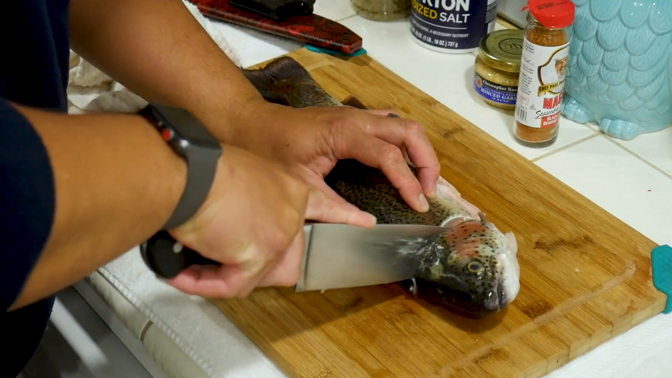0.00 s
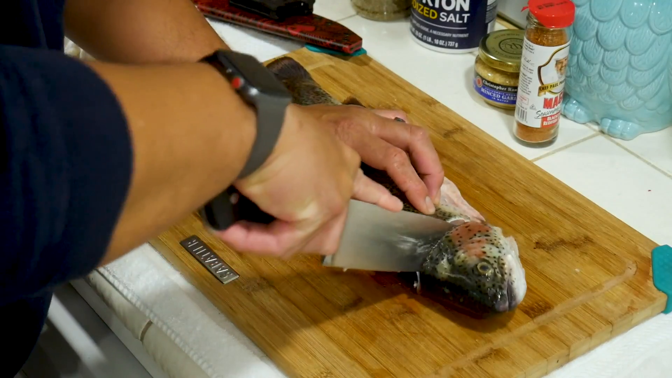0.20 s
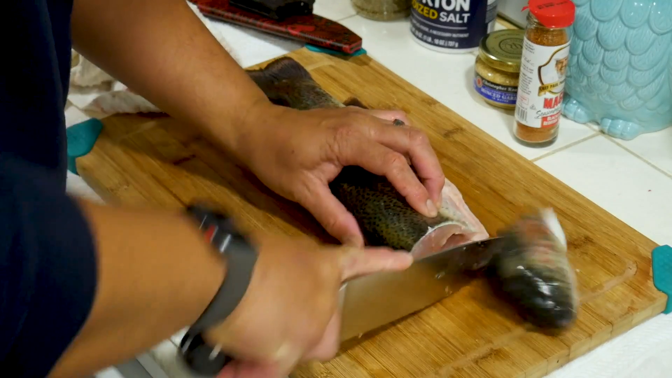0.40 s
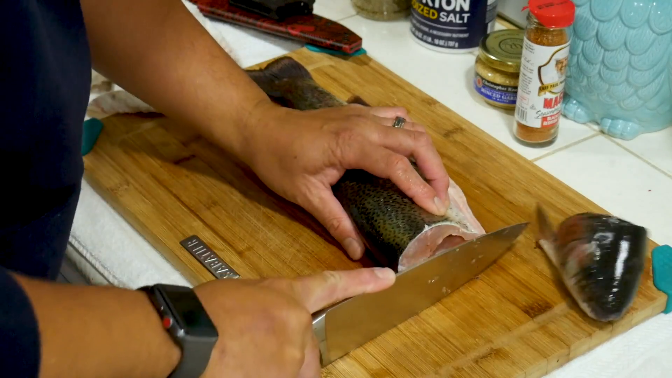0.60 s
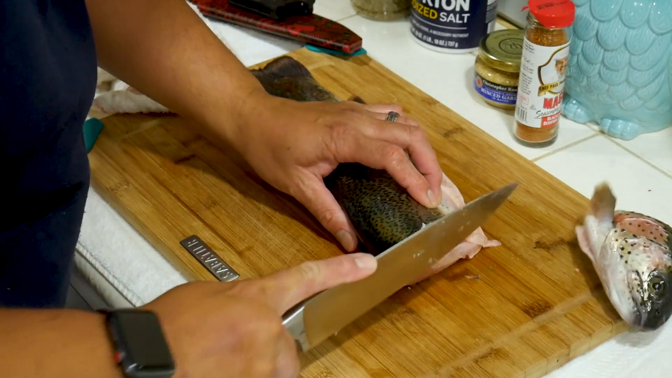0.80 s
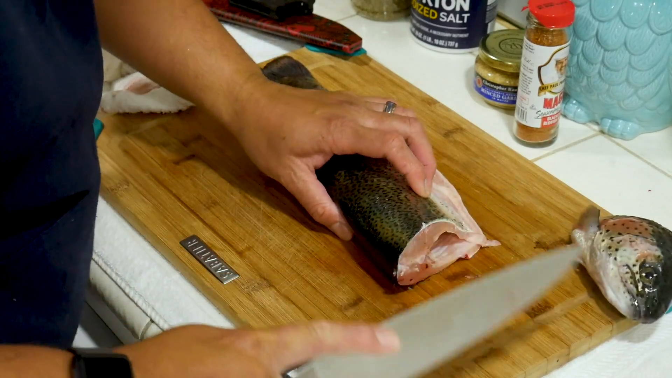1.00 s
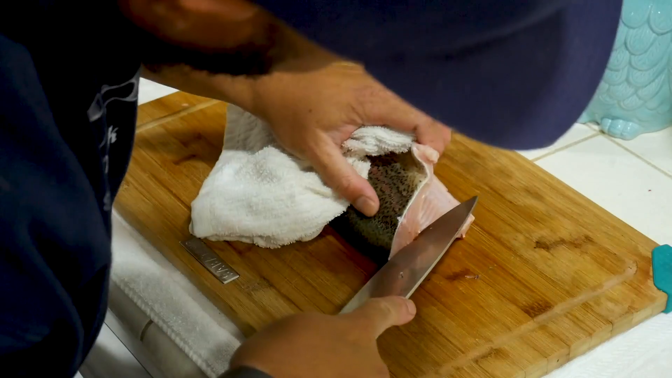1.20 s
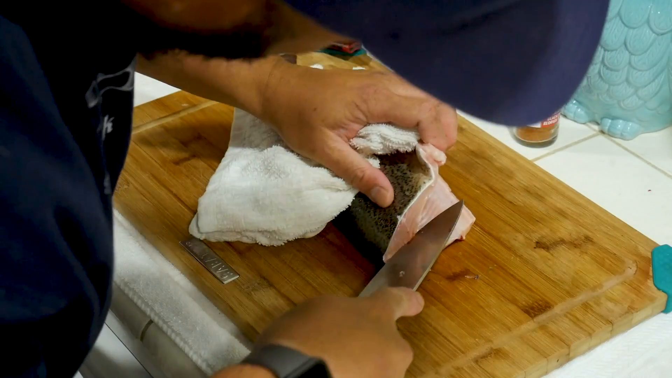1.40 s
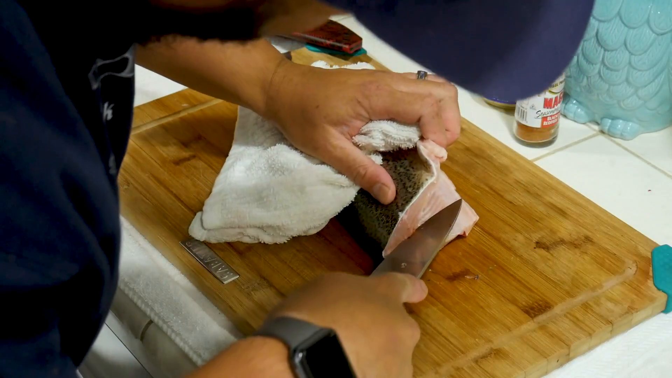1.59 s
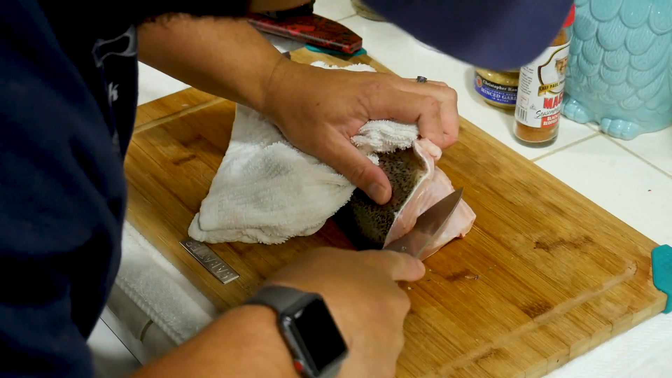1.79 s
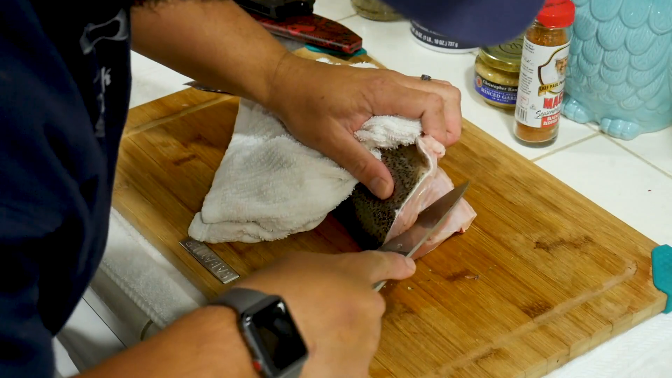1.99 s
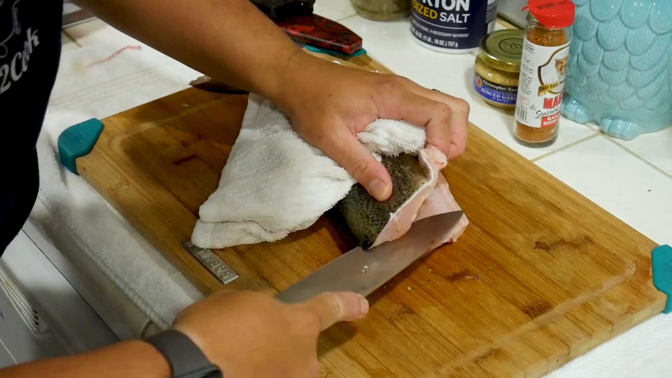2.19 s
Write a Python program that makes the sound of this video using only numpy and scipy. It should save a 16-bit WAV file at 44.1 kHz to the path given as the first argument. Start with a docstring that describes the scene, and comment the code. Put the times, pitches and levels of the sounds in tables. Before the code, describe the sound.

A knife chops through a fish's backbone with one loud sharp snap and board thuds

```python
"""A knife cuts through a fish on a wooden board, heard close: the backbone snaps, the blade hisses on and
crunches onto the wood with soft thuds; later small bones crack and skin ticks over a low appliance drone.
The snap is one coloured impulse, cracks are noise bursts with a short ring, thuds are board and counter
modes, the slide is dense noise grains, ticks are damped sines. Two decaying noises make the tiled kitchen."""
import sys
import numpy as np
from scipy import signal
from scipy.fft import rfft, irfft, next_fast_len
from scipy.io import wavfile
from scipy.ndimage import map_coordinates

SR = 44100
rng = np.random.default_rng(int(sys.argv[2]) if len(sys.argv) > 2 else 0)


def generate_wav(sig):
    """Save sig (samples, or channels by samples) to the path in sys.argv[1] as 16-bit PCM at SR."""
    pcm = np.round(np.clip(np.atleast_2d(sig).T, -1, 1) * 32767).astype(np.int16)
    wavfile.write(sys.argv[1], SR, pcm)


def magnitude_from_level(level_db):
    """Linear magnitude for a level in decibels (20 dB per decade)."""
    exponent = np.asarray(level_db, float) / 20
    return 10 ** exponent


N = 97020  # samples, 2.2 s


def unit(x):
    """Scale to rms 1."""
    return x / np.sqrt(np.mean(x ** 2) + 1e-20)


def along(points, hz):
    """Read a curve of (Hz, value) points on a log frequency axis."""
    f, v = np.transpose(points)
    return np.interp(np.log(hz + 1), np.log(f + 1), v)


def filtered(x, response):
    """Filter x by a response given as a function of frequency."""
    n = x.shape[-1]
    m = next_fast_len(n + 8192)
    return irfft(rfft(x, m) * response(np.fft.rfftfreq(m, 1 / SR)), m)[..., :n]


def resonance(f, hz, width_hz):
    """Complex response of one causal resonance, gain 1 at its peak."""
    return 1j * f * width_hz / (hz * hz - f * f + 1j * f * width_hz + 1e-9)


def add(track, s, sound):
    """Mix a sound into the track at s seconds."""
    spot = track[round(s * SR):][:len(sound)]
    spot += sound[:len(spot)]


def wobble(rate):
    """A smooth random curve with rate knots a second."""
    knots = rng.standard_normal(int(N * rate / SR) + 4)
    return map_coordinates(knots, [np.arange(N) * rate / SR])


def drone():
    """Appliance rumble and microphone hiss as shaped noise in the middle, a far fainter noise at the sides."""
    # colour of the rumble and hiss in the middle: f/Hz, relative density/dB per Hz
    mid_colour = [(12, -47.5), (20, -10), (69, -0.5), (160, -14.5), (189, -2.5), (289, -2.5), (323, -0.5),
                  (361, -7), (535, -12), (583, -12.5), (863, -18), (1050, -22), (1430, -23.5), (1790, -27),
                  (3830, -35), (14300, -39.5), (16500, -54)]
    # colour of the faint, independent noise at the sides: f/Hz, relative density/dB per Hz
    side_noise_colour = [(12, -41.5), (20, -8), (82, -16.5), (135, 0.5), (400, -1), (14300, -3.5),
                         (16500, -26)]
    level_db, side_noise_db = -52.5, -21.5  # side noise relative to the middle
    mid = unit(filtered(rng.standard_normal(N), lambda f: magnitude_from_level(along(mid_colour, f))))
    side_noise = unit(filtered(rng.standard_normal(N), lambda f: magnitude_from_level(along(side_noise_colour, f))))
    return magnitude_from_level(level_db + 1.2 * wobble(5.6)) * np.array([mid, magnitude_from_level(side_noise_db) * side_noise])


def kitchen(x):
    """Near counter and tiles answer first, the room dies band by band; mid and side answers are unrelated."""
    # how long the room rings: f/Hz, t60/s
    room_decay = [(70, 0.25), (250, 0.99), (600, 0.65), (2000, 0.68), (5500, .58), (8000, 0.45),
                  (12000, 0.368)]
    room_db, near_db, near_t60_s = -11, -6, 0.071
    hz, frame_s, noise = signal.stft(rng.standard_normal((2, SR)), SR, nperseg=256)
    decay = magnitude_from_level(-60 * frame_s / along(room_decay, hz)[:, None])
    tail = signal.istft(noise * decay, SR, nperseg=256)[1]
    t = np.arange(tail.shape[1]) / SR
    room = tail * (1 - np.exp(-t / 0.01))  # swells in over about 10 ms
    near = rng.standard_normal(tail.shape) * magnitude_from_level(-60 * t / near_t60_s)
    answer = magnitude_from_level(room_db) * room / np.linalg.norm(room[0])
    answer = answer + magnitude_from_level(near_db) * near / np.linalg.norm(near[0])
    delayed = np.pad(x, (60, 0))  # 1.4 ms to the first surface
    return signal.fftconvolve(delayed[None], answer, axes=1)[:, :N]


def ticks():
    """Wet skin and scales part in tiny damped sine clicks, joined by a faint even patter."""
    # skin and scales: t/s, level/dB, f/Hz; level and pitch vary a little at random
    skin_ticks = [(0.063, -45.5, 4615), (0.288, -32, 8550), (0.312, -38, 7540), (0.331, -31.5, 7000),
                  (0.3704, -31, 8145), (0.372, -31.5, 8660), (0.728, -35, 8560), (0.742, -41, 7450),
                  (0.771, -37.5, 8000), (0.779, -38.5, 8100), (0.856, -43.5, 8950)]
    # even patter: start/s, length/s, rate/pulses per s, level/dB, f/Hz
    start_s, length_s, rate, patter_db, patter_hz = (1.181, .25, 29.9, -45.5, 1850)
    tick_cycles, patter_cycles = 17, 10.4  # cycles to fall by 60 dB
    out, t = np.zeros(N), np.arange(SR // 50) / SR
    rows = [(*row, tick_cycles) for row in skin_ticks]
    for s in np.arange(start_s, start_s + length_s, 1 / rate):
        rows.append((s, patter_db, patter_hz, patter_cycles))
    for s, db, hz, cycles in rows:
        size, pitch = rng.standard_normal(2)
        envelope = magnitude_from_level(db + 1.2 * size - 60 * t * hz / cycles) * (1 - np.exp(-t * hz))
        add(out, s, envelope * np.sin(2 * np.pi * hz * (1 + 0.03 * pitch) * t))
    return out


def slide():
    """The blade slides through the cut: dense random grains of steel on flesh and bone over soft noise."""
    # loudness of the rub: t/s, level/dB
    rub_level = [(0, -57.5), (0.078, -63), (.19, -73), (.21, -60), (0.257, -44.5), (.33, -47.5),
                 (.38, -53.5), (.42, -43.5), (.7, -65), (0.799, -68), (1.0, -77.5), (2.121, -73.5),
                 (2.144, -61), (2.2, -86.5)]
    # colour of the rub: f/Hz, relative density/dB per Hz
    rub_colour = [(300, -34.5), (1000, -3), (4000, -5), (4600, 0.5), (6200, -2.5), (8000, 0.5), (10500, -9),
                  (15000, -19), (17000, -36)]
    grains_per_s, grain_spread_db = 1700, 5.5
    s, db = np.transpose(rub_level)
    hits = rng.random(N) < grains_per_s / SR
    boost = magnitude_from_level(grain_spread_db * np.minimum(rng.exponential(size=N), 2))
    grains = hits * rng.standard_normal(N) * boost
    rough = unit(grains) + 0.3 * rng.standard_normal(N)
    rub = unit(filtered(rough, lambda f: magnitude_from_level(along(rub_colour, f))))
    return rub * magnitude_from_level(np.interp(np.arange(N) / SR, s, db) + 2.3 * wobble(60))


def slice_hiss():
    """The flat of the blade hisses through the parted bone: a steep-edged noise band after the snap."""
    # loudness of the hiss: t/s, level/dB
    hiss_level = [(.204, -92), (.215, -39.5), (0.302, -43), (0.366, -48), (.4, -66)]
    centre_hz, width_hz = 5400, 1900
    s, db = np.transpose(hiss_level)
    noise = rng.standard_normal(N)
    band = unit(filtered(noise, lambda f: 1 / (1 + (2 * (f - centre_hz) / width_hz) ** 4)))
    return band * magnitude_from_level(np.interp(np.arange(N) / SR, s, db, right=-120) + 1.5 * wobble(64))


def thuds():
    """Flesh and blade land: decaying board modes, duller for a longer contact, and a boom in the counter."""
    # landings: t/s, board level/dB, contact/s, counter boom level/dB
    landings = [(0.205, -31, 0.0008, -44), (0.258, -33.5, 0.0012, -52), (0.288, -40, 0.00062, -63),
                (0.332, -40.5, 0.00028, -57), (0.3748, -23, 0.0015, -42), (0.385, -19.5, 0.0016, -51),
                (0.392, -27, 0.00099, -35), (0.439, -26, 0.00072, -38), (0.4442, -39, 0.0013, -50),
                (0.451, -34, 0.0012, -46), (0.466, -29, 0.00018, -53), (1.655, -34, 0.00037, -41),
                (1.697, -41.5, 0.00021, -40.5), (1.7045, -33, 0.00032, -61)]
    # modes of the board, detuned a little at each landing: f/Hz, relative level/dB, t60/s
    board_modes = [(220, -8, .05), (260, -2, .06), (376, -3, .045), (517, -2, .045), (620, -4, .035),
                   (740, -1, .04), (930, -3, .04), (1130, -3, .035), (1710, -4, .03), (2080, -5, .025),
                   (2800, -9, .025)]
    # modes of the counter: f/Hz, relative level/dB, t60/s
    counter_modes = [(72.6, 8, 0.186), (89.8, -7, 0.049), (167.3, 1, 0.077)]
    boom_rise_s = 0.011
    out, t = np.zeros(N), np.arange(SR // 2) / SR
    hz, level_db, t60 = np.transpose(board_modes)[:, :, None]
    boom = sum(magnitude_from_level(g - 60 * t / ring_s) * np.sin(2 * np.pi * f * t) for f, g, ring_s in counter_modes)
    boom = boom * (1 - np.exp(-t / boom_rise_s)) ** 2
    for s, db, contact_s, boom_db in landings:
        # a blow drives best the modes whose half period is near the contact time
        half_periods = 2 * hz * contact_s
        drive = 2 * half_periods ** 1.3 / (1 + half_periods ** 2.31)
        size = magnitude_from_level(level_db + 1.7 * rng.standard_normal(hz.shape) - 60 * t / t60) * drive
        detune = 1 + 0.05 * rng.standard_normal(hz.shape)
        knock = (size * np.sin(2 * np.pi * hz * detune * t)).sum(axis=0)
        add(out, s, magnitude_from_level(db) * knock * (1 - np.exp(-t / contact_s)))
        add(out, s, magnitude_from_level(boom_db) * boom)
    return out


def cracks():
    """The edge breaks bone and skin: a spike and dying gritty noise, bright in one region that rings."""
    # breaks: t/s, relative level/dB, brightest f/Hz, t60/s, top-octave gain/dB
    breaks = [(0.3745, -16, 4500, 0.053, -2.5), (0.382, -16, 3670, 0.02, 6), (0.387, -14, 7440, 0.043, -17),
              (0.391, -11.5, 7900, .024, -3), (0.3946, -11.5, 2848, 0.017, -1.5),
              (0.399, -14.5, 8140, 0.016, -7.5), (0.401, -11, 3860, 0.028, 3),
              (0.4376, -26.5, 2110, 0.019, -11.5), (0.459, -31, 2798, 0.03, -11.5),
              (0.467, -29.5, 2406, 0.036, -10.5), (0.474, -31.5, 3500, 0.031, -9.5),
              (0.945, -45.5, 5710, 0.043, -9.5), (1.5171, -42, 6430, 0.03, 8),
              (1.6537, -24.5, 11940, 0.037, 24.5), (1.657, -26.5, 7800, 0.036, -10),
              (1.6967, -23, 4970, 0.04, 0), (1.7034, -33, 5310, 0.14, 6.5), (1.7335, -20.5, 8640, 0.046, 1),
              (1.767, -28.5, 7710, 0.013, -0.5), (2.141, -47.5, 7860, 0.034, 6.5),
              (2.146, -36.5, 8300, 0.038, 16), (2.1495, -31.5, 8270, 0.023, 10.5)]
    # colour common to all: f/Hz, relative density/dB per Hz
    splinter_colour = [(350, -51.5), (600, -7.5), (1330, -10.5), (1510, -4), (2340, -7.5), (2760, -3.5),
                       (5950, -6.5), (7830, -2.5), (10600, -13), (13900, -6.5), (16000, -25.5)]
    burst_db, ring_db, ring_cycles = -9.5, -6, 61  # the ring falls 60 dB in 61 cycles
    peak_db, peak_width = -7.5, 0.2  # bright region, width as a share of its frequency
    knock_db, knock_t60_s = -1, 0.006
    top_octave_hz, spike = 10510, 3.7
    out, t = np.zeros(N), np.arange(SR // 10) / SR
    for s, db, hz, t60, top_db in breaks:
        grit = rng.standard_normal(len(t)) * magnitude_from_level(6.8 * rng.standard_normal(len(t)))
        grit[6] += spike

        def tint(f):
            base = magnitude_from_level(along(splinter_colour, f) + top_db * (f > top_octave_hz))
            return base * (1 + magnitude_from_level(peak_db) * np.abs(resonance(f, hz, peak_width * hz)))

        shape = magnitude_from_level(-60 * t / t60) + magnitude_from_level(knock_db - 60 * t / knock_t60_s)
        burst = shape * filtered(grit, tint)
        # the burst takes its energy from the envelope, whatever its colour
        add(out, s, magnitude_from_level(db + burst_db) * unit(burst) * np.sqrt(np.mean(shape ** 2)))
        ring = magnitude_from_level(db + ring_db - 60 * t * hz / ring_cycles) * np.sin(2 * np.pi * hz * t)
        add(out, s, ring)
    return out


def snap():
    """The backbone breaks: a single impulse through the minimum-phase colour of bone and blade."""
    # the break: t/s, peak level/dB
    backbone = [(0.204, 5.5)]
    # colour of the break: f/Hz, relative density/dB per Hz
    bone_colour = [(100, -32), (220, -20.5), (360, -9.5), (720, -13), (1050, -18), (2100, -11.5),
                   (3400, -15), (4150, -4.5), (4700, 1.5), (5900, -3.5), (6400, -16.5), (7000, -3.5),
                   (8500, -9.5), (9300, -18.5), (10800, -26), (11900, -12), (12800, -24.5), (14000, -17.5),
                   (16000, -28), (18000, -25.5)]
    out, m = np.zeros(N), 2048
    # folding the cepstrum forward makes the response causal
    cepstrum = irfft(np.log(magnitude_from_level(along(bone_colour, np.fft.rfftfreq(m, 1 / SR)))), m)
    cepstrum[1:m // 2] *= 2
    cepstrum[m // 2 + 1:] = 0
    ring = irfft(np.exp(rfft(cepstrum)), m)[:m // 2]
    for s, db in backbone:
        add(out, s, -magnitude_from_level(db) * ring / np.abs(ring).max())
    return out


def scene():
    """Knife work in the middle, the room barely wider."""
    # how strongly each part reaches the walls: snap/dB, cracks/dB, all the rest/dB
    sends_db = (-5, 0, -3)
    wide_db = -29  # side of the room
    parts = [snap(), cracks(), thuds() + slide() + slice_hiss() + ticks()]
    room = sum(kitchen(part) * magnitude_from_level(db) for part, db in zip(parts, sends_db))
    mid, side = room * magnitude_from_level([[0], [wide_db]]) + drone()
    mid = mid + sum(parts)
    return np.array([mid + side, mid - side])


def top_cut(x):
    """Nothing passes above the cut-off."""
    return signal.sosfilt(signal.butter(12, 16760, fs=SR, output="sos"), x)


def record(dry):
    """The camera clips at full scale and keeps little above its band limit."""
    top_hz, cut_hz = 15900, 16800  # weak above the first, silent above the second
    clipped = np.clip(dry, -1, 1)
    mix = filtered(clipped, lambda hz: np.where(hz < top_hz, 1, magnitude_from_level(-24.5)) * (hz < cut_hz))
    return top_cut(mix)


dry = scene()
out = record(dry)
generate_wav(out)
```